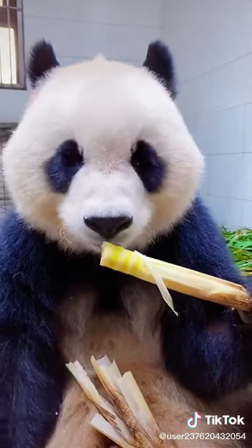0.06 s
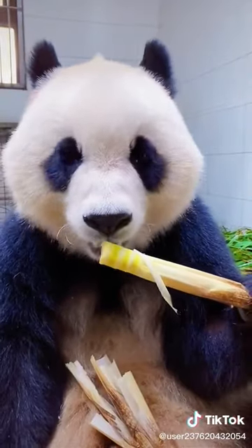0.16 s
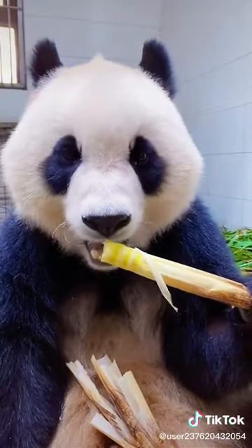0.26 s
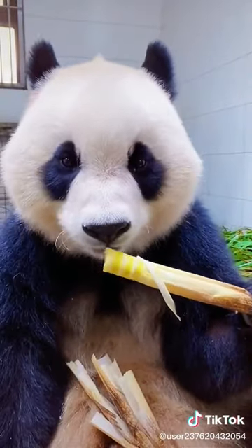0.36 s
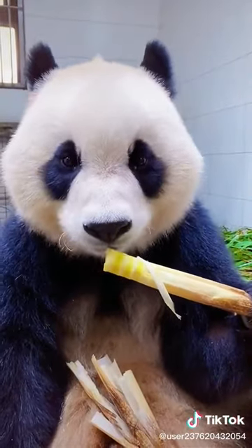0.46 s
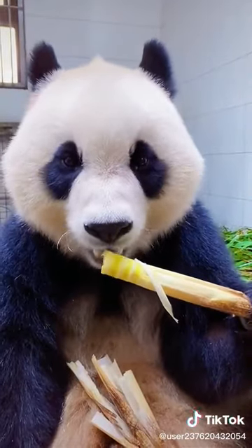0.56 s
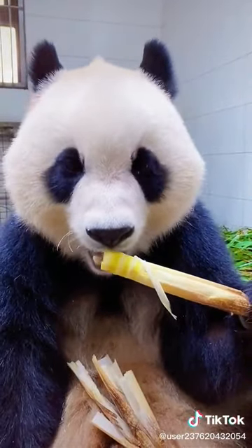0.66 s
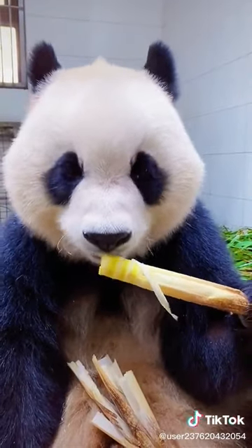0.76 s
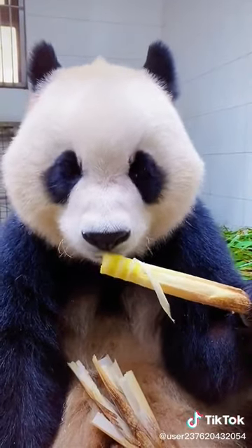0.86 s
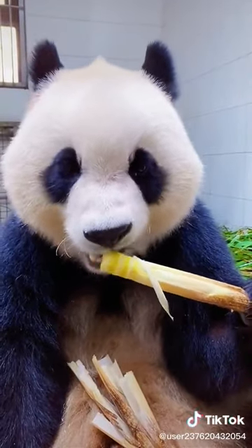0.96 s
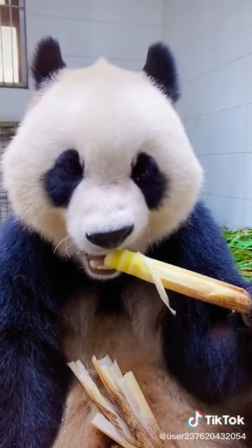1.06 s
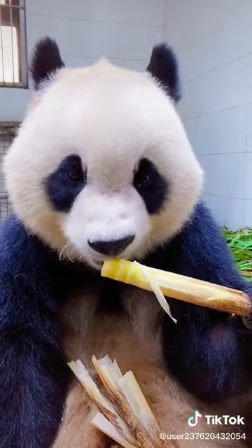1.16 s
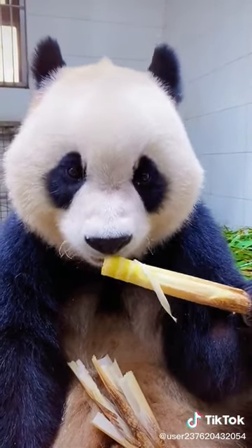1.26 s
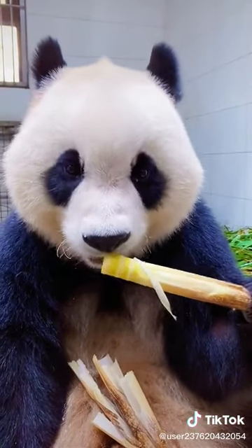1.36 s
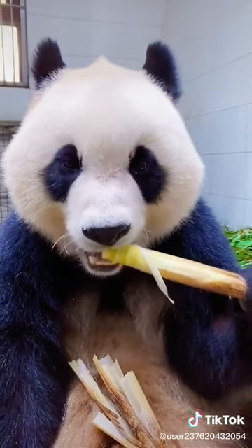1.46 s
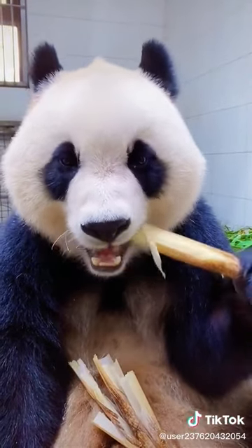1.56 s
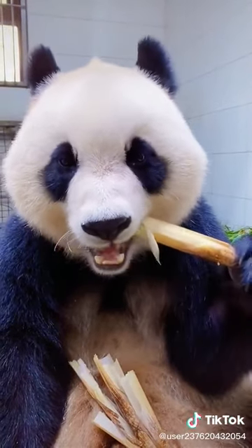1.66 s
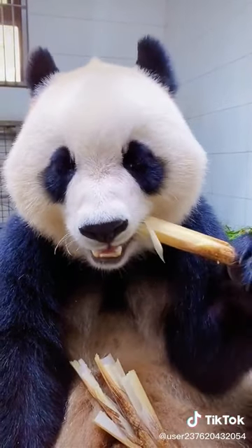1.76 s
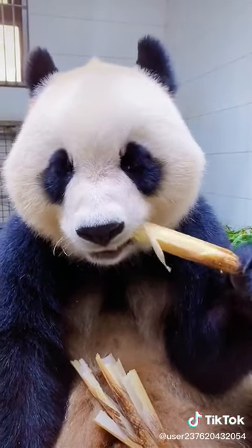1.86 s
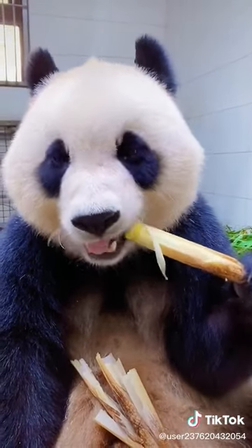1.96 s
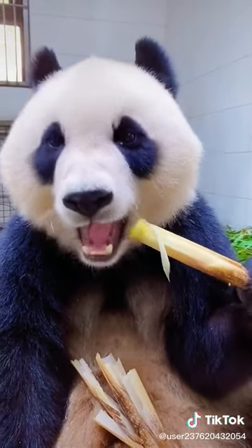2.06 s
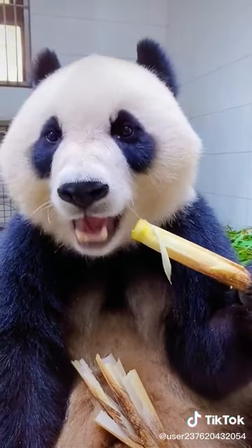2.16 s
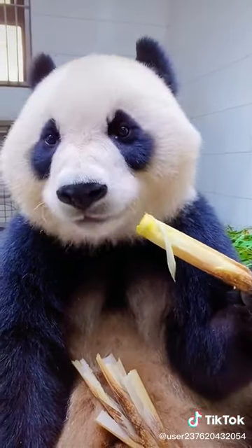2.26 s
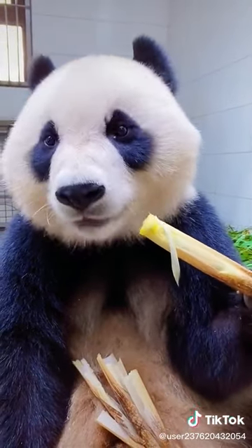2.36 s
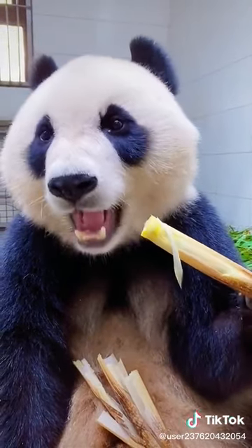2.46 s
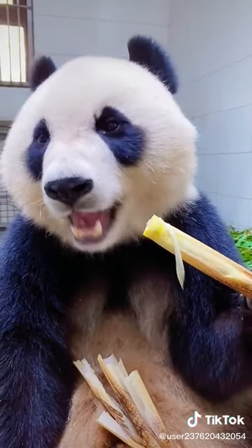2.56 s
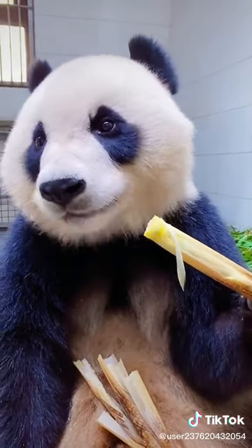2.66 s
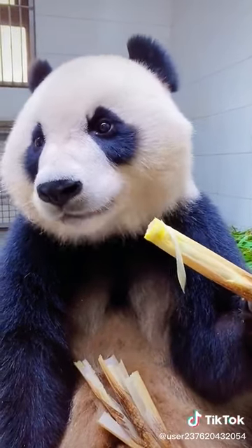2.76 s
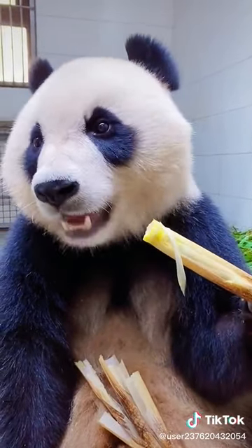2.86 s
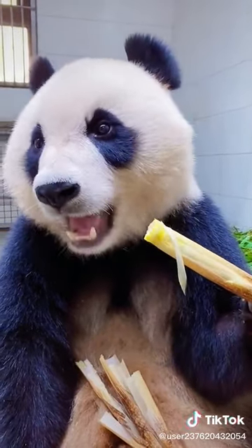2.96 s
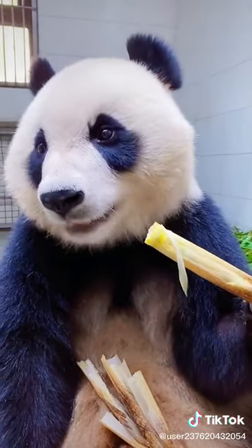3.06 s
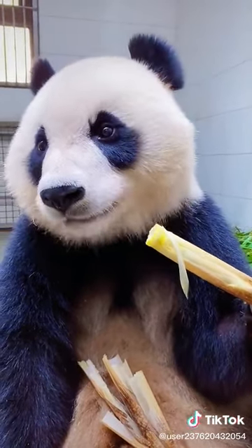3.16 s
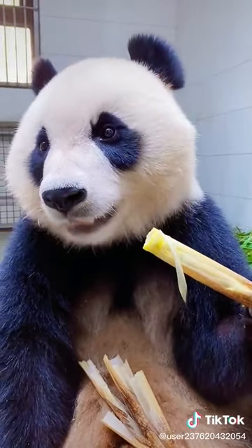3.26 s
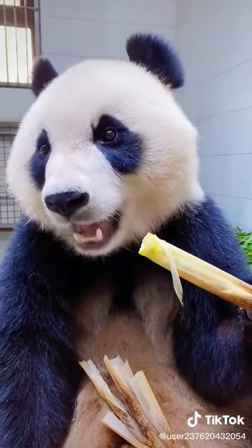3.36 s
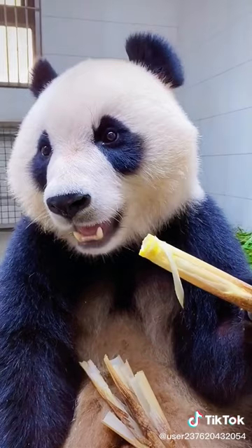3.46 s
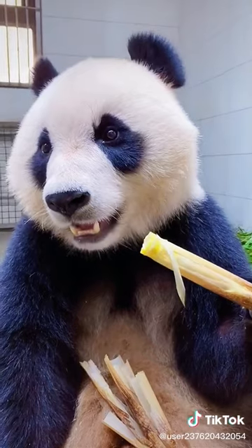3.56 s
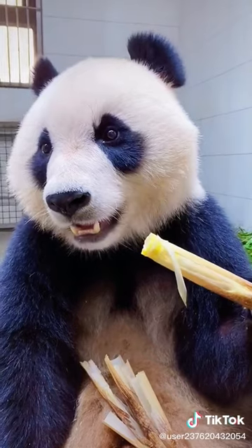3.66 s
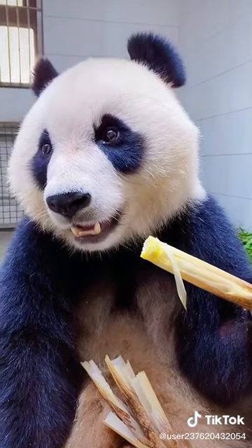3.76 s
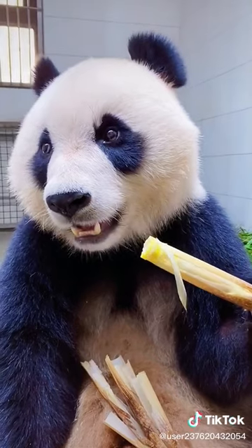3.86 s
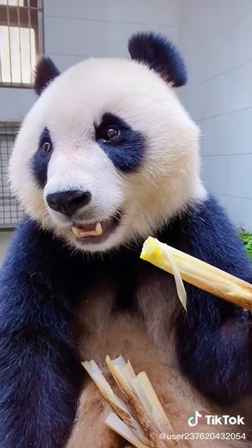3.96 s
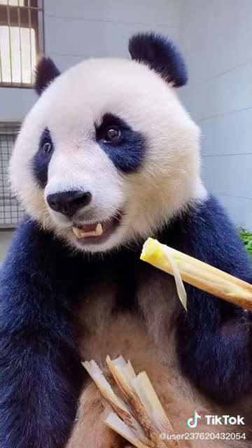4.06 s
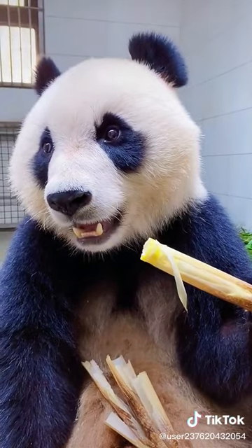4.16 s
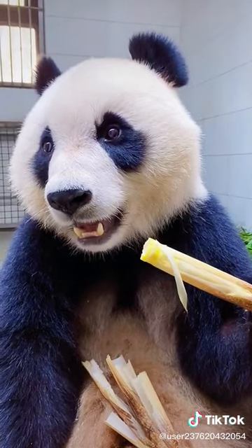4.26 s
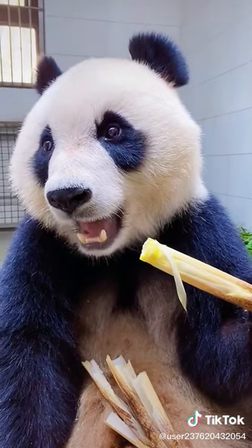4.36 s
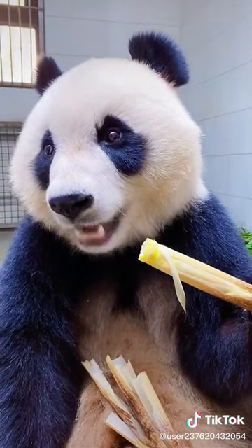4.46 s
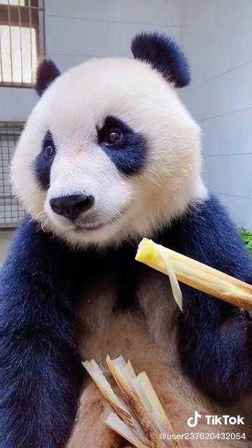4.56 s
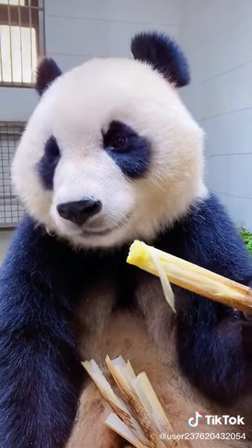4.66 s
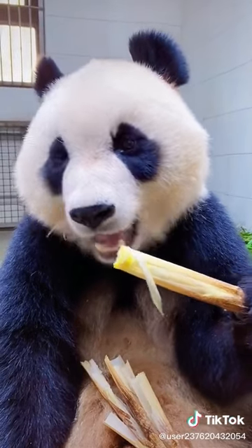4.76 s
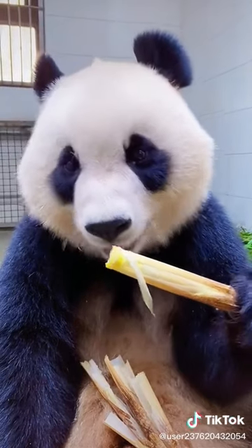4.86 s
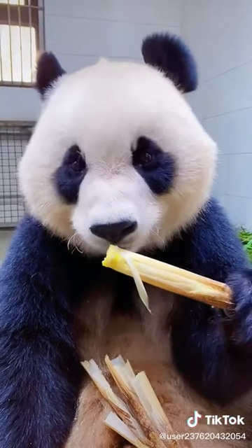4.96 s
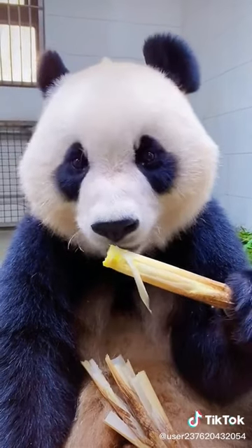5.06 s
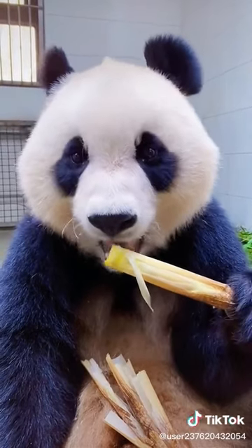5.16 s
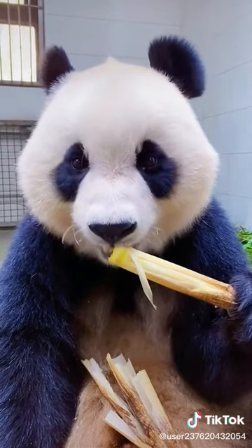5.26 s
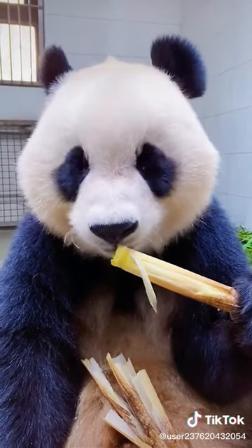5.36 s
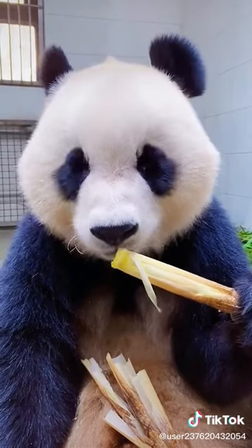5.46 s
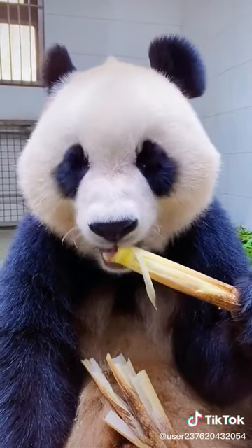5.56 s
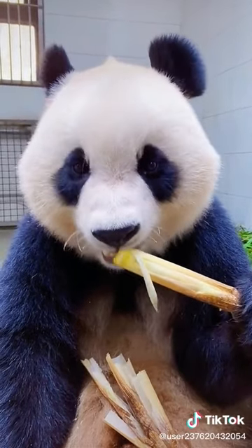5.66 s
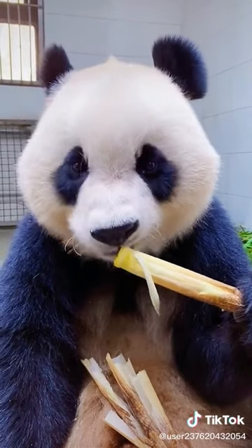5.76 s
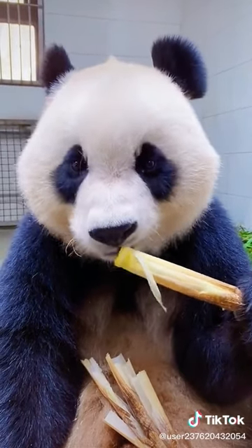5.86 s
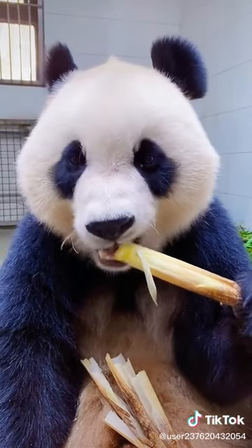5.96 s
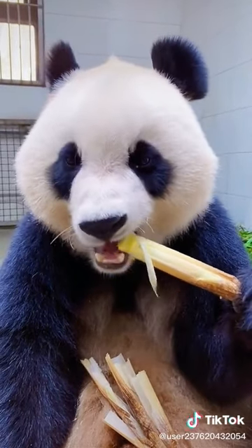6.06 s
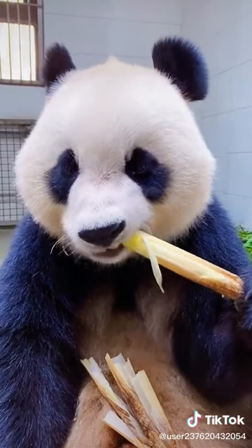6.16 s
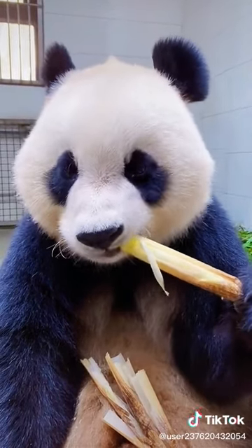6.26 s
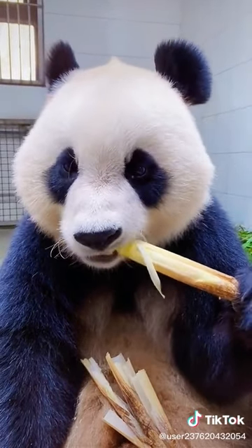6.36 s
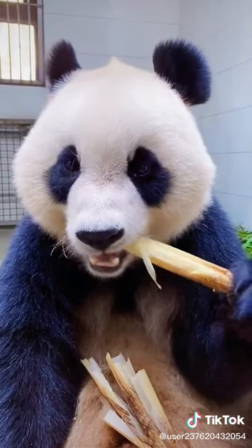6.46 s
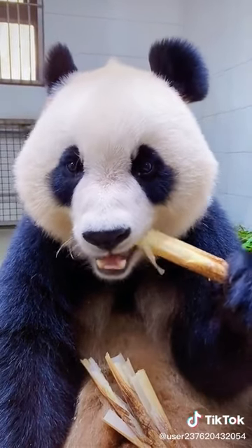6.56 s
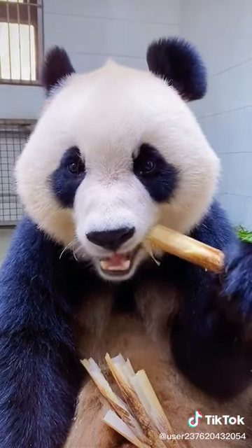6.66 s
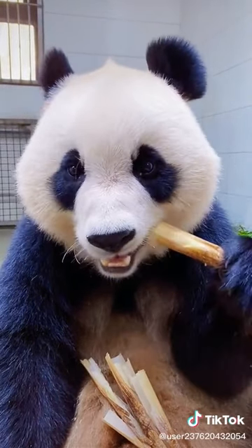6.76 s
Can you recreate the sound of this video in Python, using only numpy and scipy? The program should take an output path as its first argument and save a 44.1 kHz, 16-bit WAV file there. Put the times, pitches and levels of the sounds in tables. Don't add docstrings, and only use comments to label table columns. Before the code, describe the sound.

A large bear eats a fibrous bamboo shoot very close to a stereo phone in a bare, reverberant concrete den. From 0 s it is already crunching wet pulp, with dry cracks near 0.2, 0.55 and 0.95 s and grinding between them. Chewing eases towards 1.5 s; a juicy bite and hollow knock come at 1.8 s. At about 2.16 s the loudest crack bursts the tube with a plunging pop and ringing echo. Smaller wet snaps follow at 2.6, 2.8 and 3.3 s. From 3.7 to 4.4 s the mouth nearly rests, leaving low ventilation rumble, airy hush and a faint thin electrical whine that briefly strengthens. Crunching resumes around 4.5 s, with cracks at 4.74, 5.1, 5.55 and 6.47 s, soft presses and fine ticks between, then strong sharp, juicy bites from 6.76 s to the end at 6.8 s.

```python
import sys
import numpy as np
from scipy import signal
from scipy.fft import rfft, irfft, next_fast_len
from scipy.io import wavfile
from scipy.ndimage import uniform_filter1d, map_coordinates

SR = 44100
rng = np.random.default_rng(int(sys.argv[2]) if len(sys.argv) > 2 else 0)


def file_out(sig):
    cols = np.atleast_2d(sig).T
    lim = np.clip(cols, -1, 1)
    pcm = np.round(lim * 32767).astype(np.int16)
    wavfile.write(sys.argv[1], SR, pcm)


def boost_factor(decibels):
    exponent = np.asarray(decibels, float) / 20
    return 10 ** exponent


N = 300321


def unit(x):
    return x / np.sqrt(np.mean(x ** 2) + 1e-20)


def along(points, hz):
    f, v = np.transpose(points)
    return np.interp(np.log(hz + 1), np.log(f + 1), v)


def curves(rows):
    s, *cols = np.transpose(rows)
    return [np.interp(np.arange(N) / SR, s, c) for c in cols]


def wobble(rate):
    return map_coordinates(rng.standard_normal(4000), [np.arange(N) * rate / SR])


def swells(rows, rise):
    t = np.arange(0, N + 64, 64) / SR
    power = 0
    for s, db, fall in rows:
        slope = np.maximum((t - s) / abs(fall), (s - t) / abs(rise))
        power = power + boost_factor(db - 20 * slope) ** 2
    return np.interp(np.arange(N) / SR, t, np.sqrt(power))


def filtered(x, response):
    n = x.shape[-1]
    m = next_fast_len(n + 4096)
    return irfft(rfft(x, m) * response(np.fft.rfftfreq(m, 1 / SR)), m)[..., :n]


def modes(table):
    def response(f):
        total = 0
        for k, (c, w, db) in enumerate(table):
            total = total + (-1) ** k * boost_factor(db) * 1j * f * w / (c * c - f * f + 1j * f * w)
        return total
    return response


def spiky(size, spread_db):
    return unit(rng.standard_normal(size) * boost_factor(spread_db * rng.standard_normal(size)))


# f/Hz, likeness/0-1
ALIKE = [(60, .995), (150, .985), (300, .85), (600, .4), (1400, .5), (3000, .1), (5000, .2), (7000, .7)]


def diffuse(pair):
    turn = lambda hz: np.arccos(np.clip(along(ALIKE, hz), -1, 1)) / 2
    mid, side = filtered(pair, lambda hz: np.array([np.cos(turn(hz)), np.sin(turn(hz))]))
    return np.array([mid + side, mid - side])


# t/s, level/dB
LAMP = [
    (0, -78),
    (1.5, -78),
    (3.4, -76),
    (3.65, -68),
    (3.75, -69.5),
    (3.97, -70),
    (4.04, -66.5),
    (4.22, -66),
    (4.38, -74),
    (6.81, -75),
]


def lamp():
    flicker = boost_factor(curves(LAMP)[0] + 2.4 * wobble(12))
    return flicker * np.sin(2 * np.pi * np.cumsum(4182 + 1.5 * wobble(14)) / SR)


# t/s, level/dB
AIR = [
    (0.0, -41.5),
    (0.19, -47.5),
    (0.45, -48),
    (1.63, -49),
    (4.04, -53),
    (4.82, -47),
    (5.46, -49.5),
    (6.81, -49.5),
]
# t/s, level/dB
HUSH_DB = [
    (0, -54.5),
    (3.9, -55.5),
    (4.03, -55.5),
    (4.13, -57),
    (4.18, -54),
    (6.81, -55.5),
]
# t/s, level/dB, time to fall 20 dB/s
BOOMS = [
    (0.45, -44.5, 0.3),
    (1.66, -49, 1),
    (3.16, -52.5, 0.46),
    (4.99, -42.5, 0.39),
    (6.2, -54.5, 0.5),
]
# f/Hz, width/Hz, level/dB
DRONE_MODES = [(61.5, 12.7, -0.5), (91, 13, -3.5), (116, 20.4, 0.5)]
# f/Hz, width/Hz, level/dB
BOOM_MODES = [(148.5, 11.4, -0.5), (176.6, 34, -5.5), (390, 170, -15.5)]
# f/Hz, level per Hz/dB
HUSH = [(25, -20), (60, 4), (100, 2.5), (200, -12), (300, -8), (450, -19), (600, -18.5), (1500, -27.5),
        (3600, -25.5), (6000, -43.5), (9000, -56.5), (16000, -67.5)]


def ventilation():
    def room_noise(table):
        return unit(filtered(rng.standard_normal((2, N)), lambda hz: modes(table)(hz) ** 1.336))

    drone = boost_factor(curves(AIR)[0] - 1.5) * room_noise(DRONE_MODES)
    thumps = swells(BOOMS, 0.19) + boost_factor(-64.5)
    boom = boost_factor(-0.5) * thumps * room_noise(BOOM_MODES)
    rush = unit(filtered(rng.standard_normal((2, N)), lambda hz: boost_factor(along(HUSH, hz))))
    return diffuse(drone + boom + boost_factor(curves(HUSH_DB)[0]) * rush)


# f/Hz, time to fall 60 dB/s
DEN = [(150, 3.6), (500, 1.25), (1400, 1), (3700, 0.95), (6000, 0.57), (10000, 0.18), (16000, 0.41)]
# f/Hz, level/dB
WET = [(150, 2), (500, -5), (750, -5), (1100, -6.5), (2000, -6), (4000, -2), (9000, -4.5)]


def den(groups):
    hz, t, z = signal.stft(rng.standard_normal((len(groups), 2, 2 * SR)), SR, nperseg=256)
    t60 = np.maximum(along(DEN, hz), .1)[:, None]
    fade = boost_factor(along(WET, hz)[:, None] - 60 * t / t60)
    build = 1 - np.exp(-t / 0.0091)
    even = np.sqrt(t60 * SR / np.log(1e6))
    tail = signal.istft(z * fade * build / even, SR)[1]
    late = np.pad(groups, ((0, 0), (260, 0)))[:, None]
    return diffuse(signal.fftconvolve(late, tail, axes=2)[..., :N].sum(0))


# t/s, level/dB, dull part beside bright part/dB
TICKS = [(0.1775, -45, 9), (0.3561, -42, -16), (0.4943, -54, -5), (0.5945, -45.5, -6), (0.832, -46, -1),
         (0.8804, -57, -1), (0.9423, -55, 0), (0.9612, -50, 0), (1.2386, -51, -9), (1.3284, -60, -1),
         (1.3473, -49.5, 12), (1.698, -52, 6), (1.718, -47, 4), (1.735, -45, -3), (1.7469, -35, -5),
         (2.159, -32, -17), (2.167, -32, -17), (2.4159, -42, 4), (2.4853, -48, -10), (2.5287, -48, -13),
         (2.5995, -37.5, -6), (2.7791, -49, -18), (2.805, -44, 1), (2.8439, -32.5, 1), (3.1313, -52, -8),
         (3.2196, -60, -7), (3.2196, -51, -17), (3.2879, -39, -14), (4.4807, -57, -14.5), (4.556, -47, -2),
         (4.6094, -43, -7), (4.6683, -51, -14), (4.7147, -43, -2), (4.8983, -45, 1.5), (5.0594, -40, -22),
         (5.2854, -50.5, 4), (5.3837, -56, -13), (5.3837, -40.5, -23), (5.4625, -39, -19),
         (5.5458, -55, -2), (5.8192, -56, -9), (5.8631, -59, -0.5), (5.8985, -51, 1), (5.9828, -46, -14),
         (6.1699, -49, -10), (6.2447, -49, -13), (6.3036, -43.5, -18.5), (6.3579, -42, -13),
         (6.4243, -48, -7), (6.4467, -44.5, 4), (6.6079, -60, -4), (6.7491, -49, -9), (6.7605, -31.5, 3),
         (6.794, -30.5, -13)]
# f/Hz, level per Hz/dB
BRIGHT = [(5000, -31), (7000, -3), (10500, 1), (13000, -6), (16000, -17)]
DULL = [(1200, -24.5), (2500, -5), (5000, -0.5), (7000, -7), (9000, -30.5)]


def ticks():
    t = np.arange(SR // 100) / SR
    decay = np.exp(-t / .0012)
    bright, dull = np.zeros((2, N + SR))
    for s, db, dull_db in TICKS:
        start = round(s * SR)
        bright[start:][:len(t)] += boost_factor(db + 1) * decay
        dull[start:][:len(t)] += boost_factor(db + 1 + dull_db) * decay
    noise = rng.standard_normal((3, N))
    pair = noise[0] + 0.79 * noise[1:]
    colour = lambda points: unit(filtered(pair, lambda hz: boost_factor(along(points, hz))))
    return bright[:N] * colour(BRIGHT) + dull[:N] * colour(DULL)


# t/s, level/dB, first f/Hz, last f/Hz
POPS = [
    (2.1595, -14, 2180, 1490),
    (2.1675, 1, 2530, 709),
]


def pops():
    out, t = np.zeros(N + SR), np.arange(SR // 20) / SR
    plunge_s, rise_s, t60_s = 0.0013, .0006, .018
    for s, db, first_hz, last_hz in POPS:
        pitch = last_hz + (first_hz - last_hz) * np.exp(-(t / plunge_s) ** 2)
        turns = np.cumsum(pitch) / SR
        loudness = boost_factor(db - 60 * t / t60_s) * (1 - np.exp(-t / rise_s))
        out[round(s * SR):][:len(t)] += loudness * np.sin(2 * np.pi * turns)
    return out[:N]


# t/s, level/dB, f/Hz, time to fall 60 dB/s
KNOCKS = [(0.963, -35, 373, 0.032), (1.793, -19.5, 440, 0.019), (1.849, -30.5, 372, 0.068),
          (1.925, -50, 390, 0.05), (1.958, -43, 380, 0.054), (2.169, -31.5, 187, 0.028),
          (2.17, -25.5, 390, 0.019), (0.226, -27.5, 820, 0.062), (5.155, -40, 832, 0.04),
          (6.096, -42, 747, 0.054), (2.173, -17, 744, 0.076), (2.1701, -16, 579, 0.033),
          (3.233, -43, 422, 0.031), (3.267, -35, 500, 0.032), (3.335, -39.5, 608, 0.047),
          (5.958, -39, 560, 0.026)]


def knocks():
    out, t = np.zeros(N + SR), np.arange(SR // 2) / SR
    flutter = 1 + .5 * np.sin(2 * np.pi * 45 * t)
    rise = 1 - np.exp(-t / 0.00033)
    for s, db, hz, t60 in KNOCKS:
        ring = np.sin(2 * np.pi * hz * t * (1 - 0.89 * t))
        out[round(s * SR):][:len(t)] += boost_factor(db - 60 * t / t60) * flutter * rise * ring
    return out[:N]


# t/s, crunch
# level/dB, wet fizz level/dB, time to fall 20 dB/s
CHEWS = [(0.0, -38.5, -49, 0.19), (0.328, -35, -51, 0.1), (0.61, -44.5, -61, 0.95),
         (0.99, -39.5, -54.5, 0.18), (1.35, -59, -58, 0.6), (1.45, -43, -65, 0), (1.787, -33, -41, 0.14),
         (2.241, -30, -63, 0.58), (2.62, -39.5, -45.5, -0.01), (2.83, -67, -57, 0.64),
         (3.087, -41.5, -58.5, 0.18), (3.28, -44, -59.5, 0.41), (4.189, -71.5, -71, 1.5),
         (4.502, -39, -60, 0.2), (4.599, -44, -63, 0.2), (4.738, -40.5, -60, -0.3), (4.89, -42, -61, 0.26),
         (5.13, -51.5, -57, 0.5), (5.29, -39.5, -58, 0.2), (5.6, -50, -59, 0.5), (5.98, -44, -55.5, 0.15),
         (6.31, -67, -69, 4), (6.45, -55, -60, 0.8), (6.771, -45.5, -49, 10)]
# t/s, level/dB
WORK = [
    (0, -47),
    (1.3, -57),
    (2.1, -54),
    (3.3, -51),
    (3.7, -82),
    (4.05, -76.5),
    (4.4, -75),
    (4.55, -49.5),
    (6.81, -58),
]
# f/Hz, width/Hz, level/dB
SHOOT = [(560, 138, -5), (820, 130, 6), (1230, 420, -8), (1460, 18, 3.5), (1680, 430, -4.5),
         (2028, 60, 3.5), (2330, 305, -10), (3150, 140, -1), (4300, 1100, -20)]
# f/Hz, level per Hz/dB
BODY = [(150, -39.5), (400, -2), (800, -3), (2200, -7), (3500, -3), (5000, -31.5), (8000, -41.5)]
# f/Hz, level per Hz/dB
FIZZ = [(2500, -26.5), (4000, -1.5), (5600, -1.5), (7500, -3.5), (10000, -8), (13000, -11), (15500, -16.5),
        (17000, -65)]


def grinding():
    work = boost_factor(curves(WORK)[0])
    closing_s = 0.073
    pressing = np.hypot(work, swells([(s, db, fall) for s, db, _, fall in CHEWS], closing_s))
    juice = np.hypot(work * boost_factor(-11), swells([(s, db, fall) for s, _, db, fall in CHEWS], closing_s))
    clumps = 2.17 * wobble(8.1) + 1.84 * wobble(40) + 3.7 * wobble(200)
    crunch = filtered(boost_factor(clumps) * spiky(N, 2.6),
                      lambda hz: modes(SHOOT)(hz) + boost_factor(along(BODY, hz) - 6.5))
    fizz_clumps = boost_factor(0.5 * clumps + 0.64 * wobble(90))
    fizz = filtered(fizz_clumps * spiky(N, 3.2), lambda hz: boost_factor(along(FIZZ, hz)))
    return boost_factor(-6.0) * pressing * unit(crunch) + boost_factor(-2.5) * juice * unit(fizz)


# t/s, level/dB, mouth f/Hz, second mouth f/Hz, length/ms
CRACKS = [(0.1608, -27, 1600, 590, 1.1), (0.2245, -21, 813, 880, 3.8), (0.5466, -29.5, 1040, 1600, 5.3),
          (0.9498, -28, 1470, 600, 1.8), (0.9631, -23, 1460, 4300, 3.3), (1.4583, -26.5, 1170, 1480, 2.9),
          (2.1358, -32, 1590, 2330, 3.5), (2.1605, -17.5, 1610, 3470, 2.4), (2.1678, -10, 2104, 3480, 6.5),
          (2.172, -14, 1500, 2200, 1.5), (2.8116, -27, 1410, 2180, 4.1), (3.325, -29, 1480, 2210, 11),
          (4.7382, -23.5, 1530, 930, 8.1), (4.7497, -25.5, 1520, 920, 5.8), (5.089, -27.5, 910, 2220, 2.1),
          (5.5484, -22, 1230, 1900, 8.6), (6.4633, -22.5, 1220, 930, 2.7), (6.4814, -21, 1085, 1440, 1.1)]
# t/s, level/dB, mouth f/Hz, second mouth f/Hz, length/ms
BITES = [(0.2187, -32.5, 1630, 3320, 3.7), (1.791, -17.5, 2130, 1590, 4.8), (1.794, -21.5, 1180, 2600, 4.3),
         (2.151, -27, 820, 2420, 6.3), (2.597, -26.5, 1930, 645, 9.8), (2.6094, -29.5, 1390, 2160, 4.7),
         (2.6173, -25, 1350, 2280, 4.9), (2.779, -23.5, 2220, 1360, 4.4), (2.8424, -20.5, 1570, 1010, 4.5),
         (3.2316, -28, 2160, 1110, 5.3), (3.2667, -24.5, 1460, 3060, 2.7), (2.8386, -29.5, 4800, 3070, 2.3),
         (4.7153, -27, 2150, 5050, 4.4), (5.074, -29, 3170, 2040, 2.3), (6.452, -38.5, 2850, 3860, 6.5),
         (6.7596, -21, 3400, 696, 6.2), (6.793, -14, 1810, 1010, 1.65), (6.807, -15.5, 1740, 3200, 8.5)]
# t/s, level/dB, mouth f/Hz, length/ms
DRY = [(0.1285, -36, 3030, 3.5), (0.1681, -31.5, 1680, 15), (0.3153, -34.5, 820, 13), (0.3357, -38, 820, 8),
       (0.5517, -32.5, 1584, 11), (0.6515, -36, 920, 6.2), (0.7099, -40.5, 900, 1.9),
       (0.7892, -37, 1700, 4.6), (0.9901, -29.5, 1460, 6.2), (1.0014, -35, 900, 2.5),
       (1.1349, -38.5, 980, 19), (1.2148, -32, 1740, 1.6), (1.4305, -32, 1170, 2.5),
       (1.4405, -43, 970, 0.95), (1.6608, -35, 800, 7.8), (2.9368, -39, 1090, 4.3),
       (3.3344, -35.5, 1720, 6), (4.1232, -46.5, 2390, 2.4), (4.3945, -48.5, 986, 7.4),
       (4.4935, -35, 950, 4), (4.508, -32.5, 1930, 6.1), (4.5545, -32.5, 2330, 3.9),
       (4.862, -38, 1660, 9.9), (5.1544, -32.5, 820, 2.2), (5.27, -38.5, 1150, 20), (5.5908, -38, 1230, 11),
       (5.6392, -37.5, 3060, 8.7), (5.9566, -35.5, 1230, 1.9), (6.0017, -33, 1680, 3),
       (6.0953, -38.5, 720, 6.3)]
# t/s, level/dB, mouth f/Hz, length/ms
DAMP = [(0.058, -38.5, 1840, 2.7), (0.177, -29.5, 3300, 6.3), (0.5155, -32.5, 3200, 2.9),
        (0.5975, -31.5, 2690, 7.9), (0.89, -43, 3100, 9.4), (1.339, -32, 4600, 0.43),
        (1.344, -35, 1770, 6.1), (1.7193, -36.5, 4900, 2.4), (1.733, -35.5, 1550, 14),
        (2.5293, -43, 2300, 8.1), (2.5818, -35, 2305, 7.4), (3.104, -35, 2330, 3.9),
        (3.219, -39, 1575, 2.1), (4.574, -33.5, 2300, 6.8), (4.599, -42, 4300, 3.9),
        (4.609, -37.5, 1870, 3.1), (4.8979, -35.5, 1620, 17), (5.057, -42, 1570, 3.6),
        (5.1187, -36, 3310, 14), (5.2852, -46, 1490, 6.2), (5.4612, -33.5, 2950, 2),
        (5.503, -43, 2590, 1.2), (5.303, -38.5, 3100, 1.1), (5.8985, -43, 4470, 1.4),
        (5.9635, -46.5, 1190, 3.6), (6.2534, -38, 2970, 0.98)]
# t/s, level/dB, mouth f/Hz
SQUIRTS = [(0.356, -47.5, 860), (0.494, -47, 3150), (0.8836, -49.5, 4450), (1.2368, -48, 2540),
           (1.6975, -48.5, 1490), (1.7475, -39, 3000), (1.7656, -33.5, 3530), (1.777, -44, 3360),
           (2.416, -46, 2090), (2.4842, -51, 1990), (2.6274, -41, 1390), (2.805, -51, 2340),
           (3.0673, -44.5, 1640), (3.079, -53, 954), (3.289, -55.5, 3060), (5.374, -49, 3130),
           (5.3836, -56, 3100), (5.9056, -50.5, 5300), (6.3037, -63, 1030), (6.359, -47, 3030),
           (6.368, -45.5, 4540), (6.6072, -46, 3600)]
# t/s, level/dB, mouth f/Hz
PRESSES = [(0.777, -32.5, 1610), (0.833, -39, 900), (2.092, -36, 680), (4.471, -51.5, 1720),
           (4.483, -33, 2340), (5.211, -31, 830), (5.504, -39, 1460), (5.876, -33, 1060),
           (6.014, -49.5, 1280), (6.155, -34.5, 1110), (6.169, -35.5, 1000), (6.217, -31.5, 1450),
           (6.246, -50, 3120), (6.342, -34, 830), (6.386, -33, 860), (6.632, -36, 765)]
# t/s, level/dB, f/Hz, length/ms
SPLINTERS = [(0.003, -39, 840, 2.6), (0.023, -41, 1740, 7.2), (0.314, -40.5, 4000, 3),
             (2.1593, -38, 8700, 2.2), (0.381, -40, 1540, 4), (0.61, -37.5, 3445, 2.7),
             (0.809, -40, 3140, 4.2), (0.962, -34.5, 3250, 4), (1.13, -44, 2030, 2.7),
             (1.345, -34.5, 3380, 2.2), (1.347, -35, 870, 6), (1.448, -34.5, 2570, 3.3),
             (1.449, -39.5, 5370, 3.1), (1.713, -33.5, 613, 3.8), (1.887, -45, 2050, 4.1),
             (2.416, -41.5, 4770, 4.1), (2.577, -37.5, 3080, 2.6), (2.823, -44, 4600, 8),
             (2.84, -31, 2090, 1.9), (3.081, -40, 860, 3.2), (3.266, -36, 3300, 1.4),
             (3.276, -27, 1503, 2.1), (3.315, -42, 3440, 2.1), (3.328, -40, 3790, 4.4),
             (3.33, -43, 5000, 4), (4.367, -52.5, 2180, 4), (4.405, -48.5, 745, 3.4),
             (4.512, -36, 1900, 1.6), (4.566, -32, 2990, 2.1), (4.575, -39, 3800, 1.6),
             (4.735, -41, 3250, 3.3), (5.467, -39, 1700, 3.4), (5.545, -31, 2930, 1.7),
             (5.555, -46, 4970, 3.5), (5.643, -37.5, 850, 2.3), (5.878, -43.5, 3550, 4.8),
             (5.962, -34.5, 980, 3.2), (5.987, -45, 3830, 1.7), (6.092, -45, 3110, 2.2),
             (6.353, -39, 1060, 3.9), (6.371, -44, 2400, 3.8), (6.459, -38, 4820, 3.4),
             (2.167, -32, 9400, 2.5), (6.772, -31, 1590, 1.2), (6.779, -41, 4730, 3)]


def breaks_list():
    second = lambda hz: hz * (1.9 if hz < 1600 else .58)
    return ([(s, db, hz, two, -27, ms) for s, db, hz, two, ms in CRACKS]
            + [(s, db, hz, two, -15, ms) for s, db, hz, two, ms in BITES]
            + [(s, db, hz, second(hz), -32, ms) for s, db, hz, ms in DRY]
            + [(s, db, hz, second(hz), -13, ms) for s, db, hz, ms in DAMP]
            + [(s, db, hz, second(hz), -2.5, 5.5) for s, db, hz in SQUIRTS]
            + [(s, db - 8, hz, second(hz), -16.5, 2.5) for s, db, hz in PRESSES]
            + [(s, db, hz, hz * 1.122, -24, ms) for s, db, hz, ms in SPLINTERS])


def tearing(t, ms):
    after = np.maximum(t, 0)
    strain = 0.065 * np.exp(np.minimum(t, 0) / 0.0088) * np.exp(-after / 0.016)
    rise = 1 - np.exp(-after / (0.0004 + 0.000092 * abs(ms)))
    fall = np.exp(-(after / (0.00086 * max(ms, .5))) ** 0.92)
    return rise * fall + strain


def mouth_ring(breaks, hz, wide):
    width_hz = (100 + .095 * hz) * (1 + min(wide, 1))
    cavity = modes([(hz, width_hz, 0)])
    return filtered(breaks, lambda f: cavity(f) ** 1.48 / (1 + 1j * f / (1.98 * hz)) ** 2)


def snaps(groups):
    lead = 700
    out, t = np.zeros((groups, N + SR)), np.arange(-lead, 2400) / SR
    top = lambda x: x / np.sqrt(2 * uniform_filter1d(x ** 2, 110).max() + 1e-20)
    for k, (s, db, low_hz, second_hz, spit_db, ms) in enumerate(breaks_list()):
        wide = boost_factor(db + 10.5)
        tear = tearing(t, ms)
        blow = 3.8 / max(ms, .5) * (abs(t - 0.0003) < 1.5 / SR)
        breaks = tear * spiky(len(t), 6.05) + blow
        ring = top(mouth_ring(breaks, low_hz, wide)) - boost_factor(-7.5) * top(mouth_ring(breaks, second_hz, wide))

        wood = modes([(hz, 1.6 * w, level + 5 * rng.standard_normal()) for hz, w, level in SHOOT])
        body = lambda hz: (wood(hz) + boost_factor(along(BODY, hz) - 7.5)) / (1 + 1j * hz / 5000) ** 2
        thud = top(filtered(tear * spiky(len(t), 7.5), body))

        tilt_db = 1.5 * rng.standard_normal()
        spray = lambda hz: boost_factor(along(FIZZ, hz) + tilt_db * np.log2(hz / 6000 + .1))
        spit = top(filtered(tear * spiky(len(t), 2.3), spray)) / (1 + 0.64 * wide)

        burst = ring + boost_factor(-7.0) * thud + boost_factor(spit_db + 7.0) * spit
        out[k % groups, round(s * SR):][:len(t)] += boost_factor(db - 3.0) * burst
    return out[:, lead:lead + N]


# f/Hz, left minus right level/dB
TILT = [(200, 5.5), (400, -5.5), (750, 5.5), (1300, 3.5), (2400, 0.5), (16000, -0.1)]


def scene():
    background = ventilation() + lamp()
    mouth = snaps(groups=3)
    mouth[0] += grinding() + knocks() + pops()
    lips = lambda hz: (1j * hz / (128.3 + 1j * hz)) ** 2
    sides = np.array([[.5], [-.5]])
    near = filtered(mouth.sum(0), lambda hz: lips(hz) * boost_factor(along(TILT, hz) * sides))
    return near + den(mouth) + background + ticks()


# f/Hz, level/dB
QUIET = [(4200, -92), (5400, -92.5), (6500, -92), (9000, -104), (12400, -100), (12800, -80), (14400, -80),
         (14800, -84), (15400, -80), (15700, -70), (15900, 0)]


def thin_treble(x):
    under_db, jump_db, ragged_db, weak_db = 5, 7, 2.5, -1
    hz, t, z = signal.stft([x[0] + x[1], x[0] - x[1]], SR, nperseg=1024)
    edges = np.arange(0, len(hz), 8)
    energy = abs(z) ** 2
    power = uniform_filter1d(np.add.reduceat(energy, edges, 1), 3, 2)
    level = 10 * np.log10(abs(power) + 1e-20)
    treble = 10 * np.log10(energy[:, hz > 4500].sum((0, 1)) + 1e-20)
    sudden = (treble - np.roll(treble, 2) > jump_db) & (hz < 16500)[:, None]
    ragged = ragged_db * unit(uniform_filter1d(rng.standard_normal(level.shape), size=9, axis=2))
    nearby = np.exp(uniform_filter1d(np.log(energy + 1e-20), 9, 1))
    strong = (energy > nearby * boost_factor(weak_db) ** 2) | (hz < 1800)[:, None]
    heard = level + ragged > along(QUIET, hz[edges])[:, None]
    kept = ((level > level[::-1] - under_db) & heard).repeat(8, 1)[:, :len(hz)]
    kept = kept | sudden | (hz < 4300)[:, None]
    mid, side = signal.istft(z * strong * kept, SR)[1][:, :N]
    return np.array([mid + side, mid - side]) / 2


def low_pass(x):
    return signal.sosfilt(signal.butter(12, 16800, fs=SR, output="sos"), x)


# f/Hz, left leads by/half cycles
LEAD = [(0, 0), (3800, .1), (5500, .45), (6700, .72), (8250, 1.27), (9700, 1.73), (11650, 2.25),
        (12550, 2.72), (14500, 3.27), (16000, 4.1)]


def record(dry):
    f, turns = np.transpose(LEAD)
    sides = np.array([[1], [-1]])
    x = filtered(dry, lambda hz: np.exp(.5j * np.pi * np.interp(hz, f, turns) * sides))
    x = filtered(x, lambda hz: 1 / (1 + (36 / (hz + 1)) ** 6))
    since = np.arange(N) / SR - 2.158
    x = x * boost_factor(-0.5 * (since > 0) * np.exp(-abs(since) / 0.06))
    x = x / (1 + (x / 1.3) ** 4) ** .25
    mix = thin_treble(x)
    return low_pass(mix)


dry = scene()
out = record(dry)
file_out(out)
```